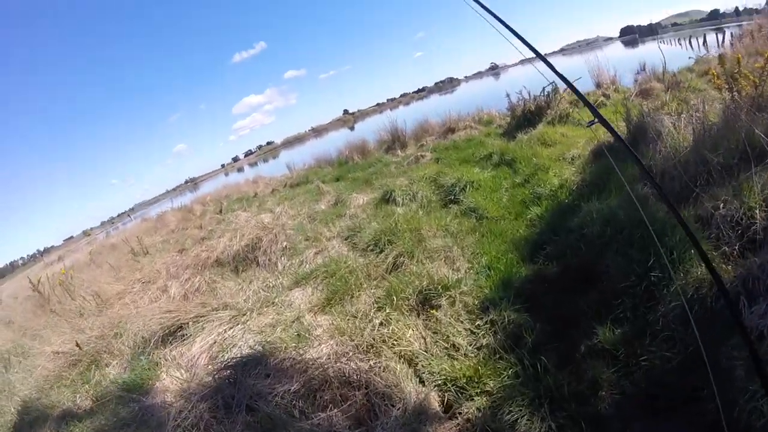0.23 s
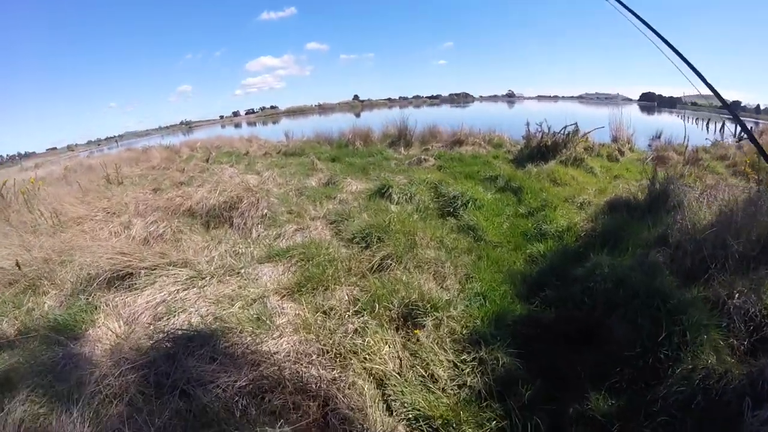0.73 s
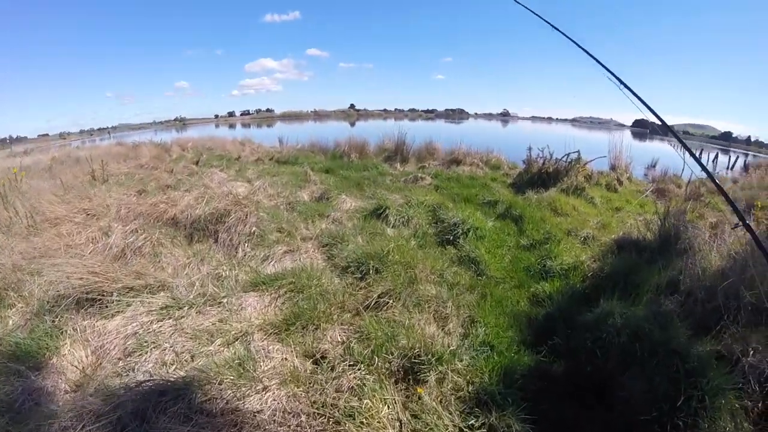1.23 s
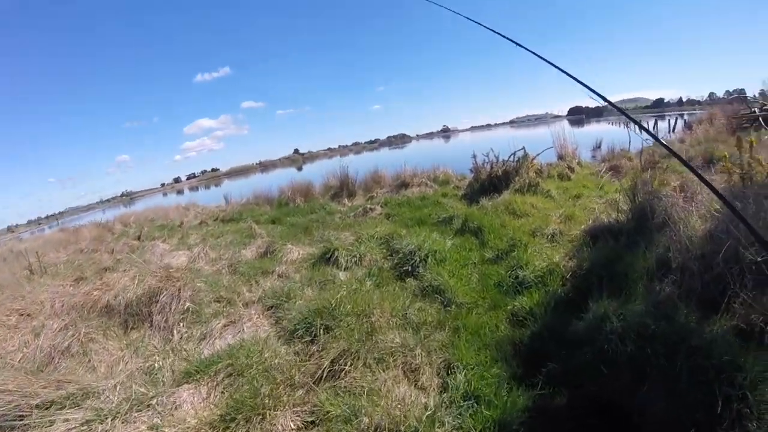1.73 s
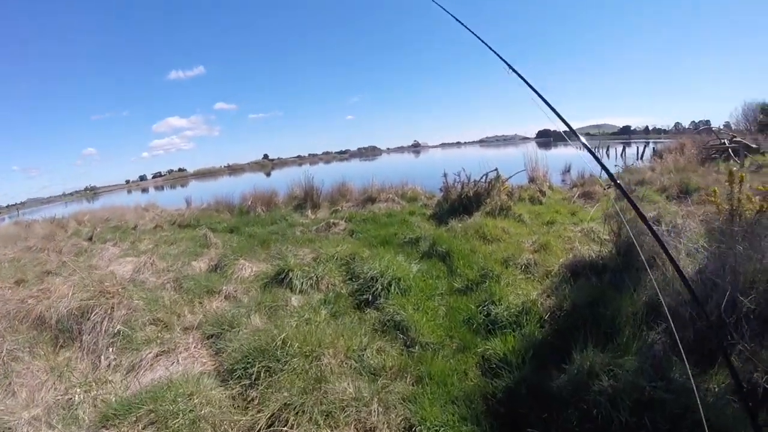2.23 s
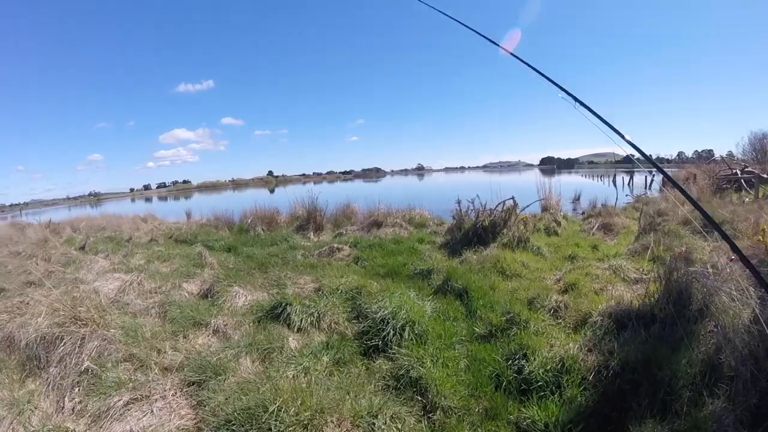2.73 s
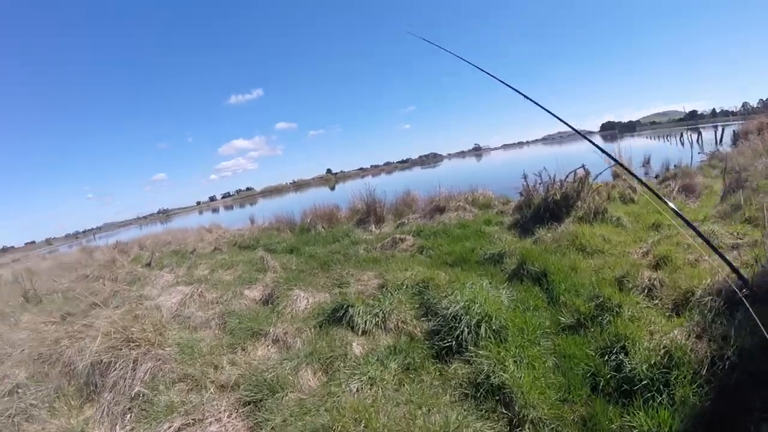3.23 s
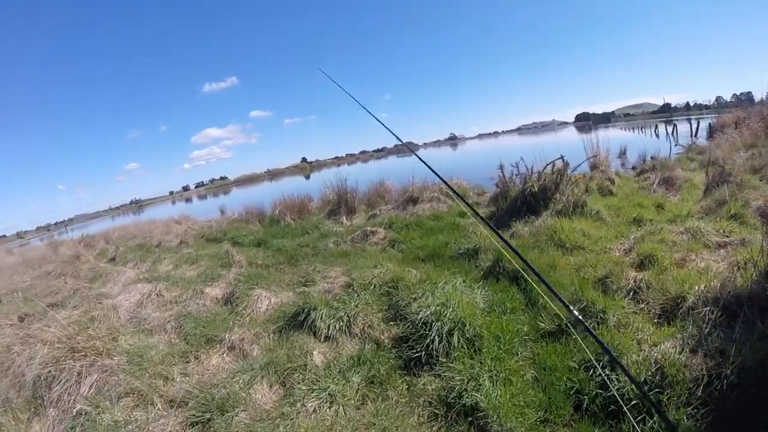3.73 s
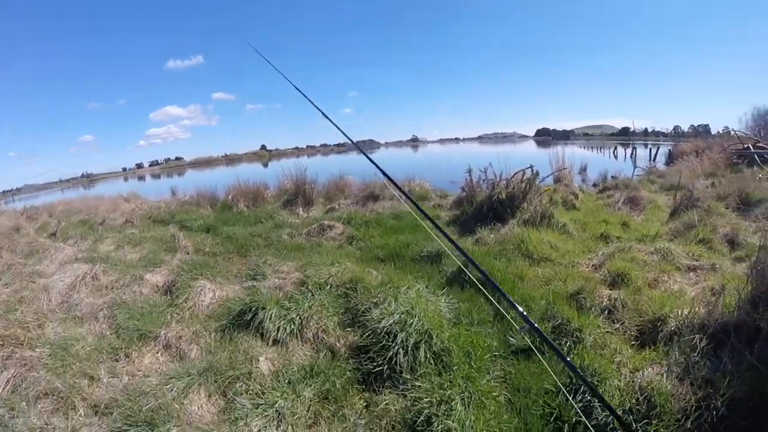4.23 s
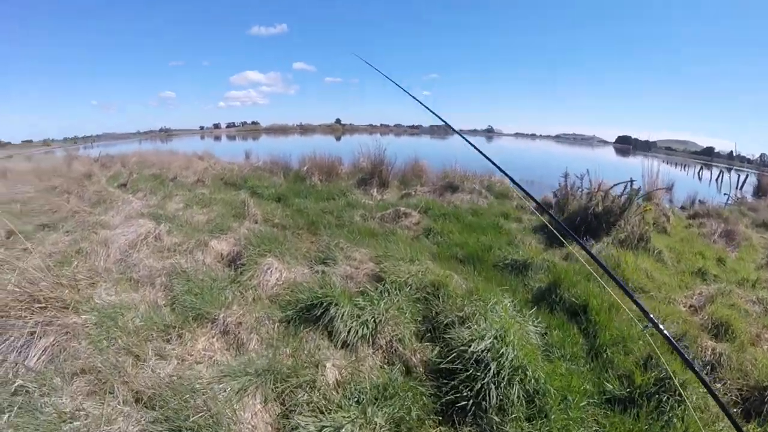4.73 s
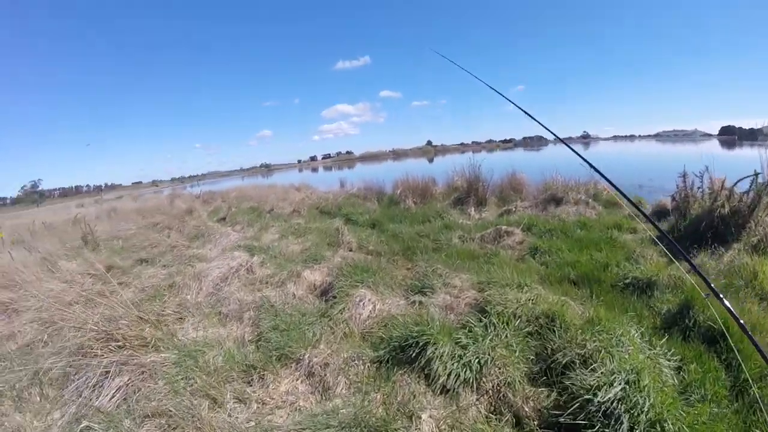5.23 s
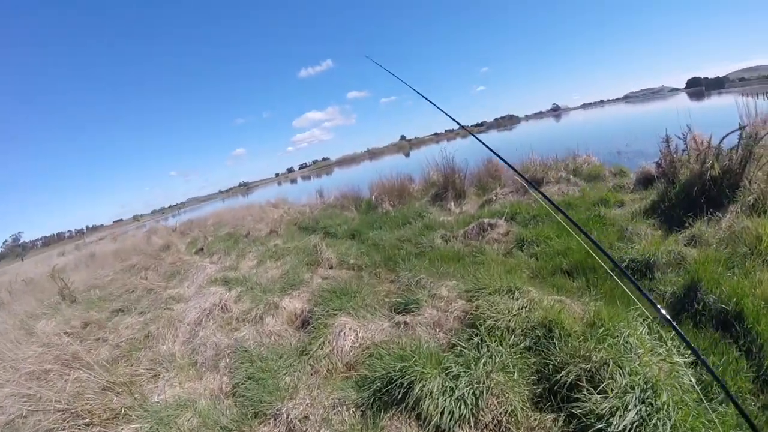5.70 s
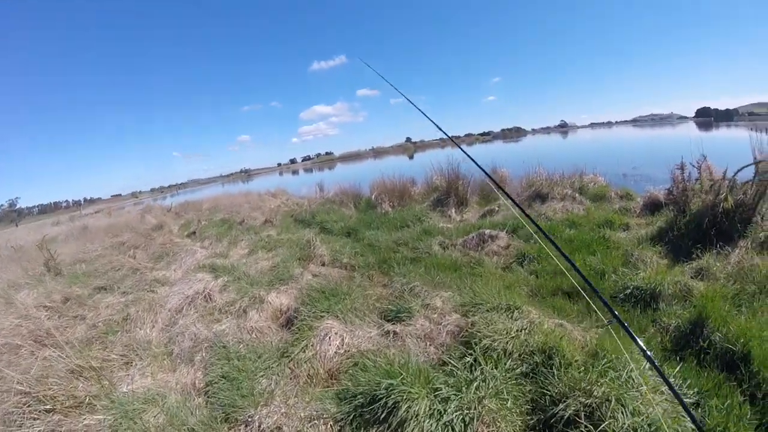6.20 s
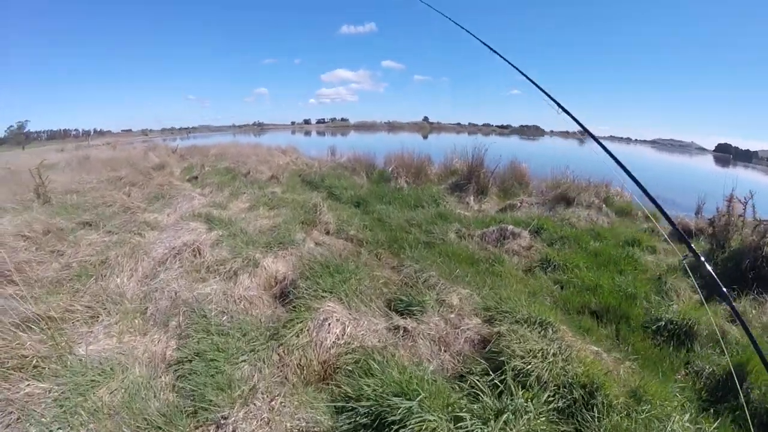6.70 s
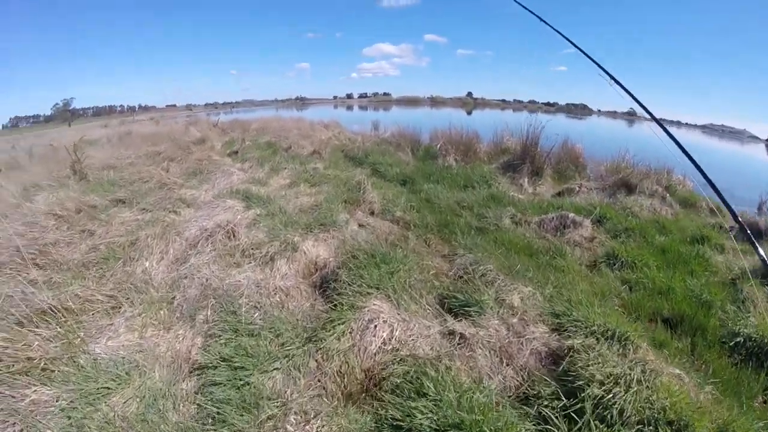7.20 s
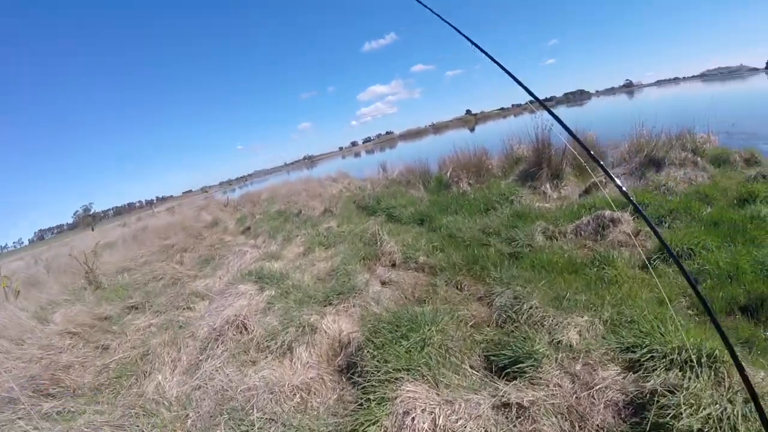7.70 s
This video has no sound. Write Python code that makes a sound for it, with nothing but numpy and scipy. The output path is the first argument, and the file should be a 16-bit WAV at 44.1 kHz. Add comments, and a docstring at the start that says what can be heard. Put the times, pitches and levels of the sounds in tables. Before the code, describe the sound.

From 0 seconds a dense frog chorus is already calling on an open lake shore. Five near frogs each repeat a rapid burst of four accelerating, ringing clicks, mostly between 2 and 4 kHz, about three to five bursts a second, interlocking over a throbbing crowd with tiny dips. Steady soft hiss and faint rubbing of clothes run throughout. Small dry knocks of a held fishing rod occur at about 0.1, 0.6 and 1.1 seconds, then a quick cluster at 2.7. Low, short wind bumps hit the microphone around 1.4 to 2.4, at 3.6 and 5.3. Grainy grass swishes pass at 2.9, 3.4 and 4.5. The chorus steadily swells; after 5 seconds sharp single clicks crowd in. A firmer knock at 6.6 and a stronger rustle at 6.8 precede the loudest frogs near 7. More wind bumps and swishes follow to 7.6, with calling continuing to 8.

```python
"""Small frogs call from a grassy lake shore, each call four quickening clicks that ring the vocal sac.
From the start five close frogs call over a crowd, with hiss, soft rubbing and a few knocks of a held fishing rod.
Wind soon buffets the microphone, as low lumps of shaped noise, and clothes and grass swish in grainy noise.
The crowd grows louder as the microphone is carried along the shore. After five seconds sharp single clicks
crowd in; near seven the two loudest frogs peak, with a last knock and a stronger rustle just before."""
import sys
import numpy as np
from scipy import signal
from scipy.fft import rfft, irfft, next_fast_len
from scipy.io import wavfile
from scipy.ndimage import uniform_filter1d

SR = 44100
rng = np.random.default_rng(int(sys.argv[2]) if len(sys.argv) > 2 else 0)


def master_out(mix):
    """Clip the mix to full scale and print it as 16-bit PCM to the path in sys.argv[1]."""
    frames = np.transpose(np.atleast_2d(mix))
    ceiling = np.clip(frames, -1, 1)
    pcm = np.round(ceiling * 32767).astype(np.int16)
    wavfile.write(sys.argv[1], SR, pcm)


N = 350595
TIME = np.arange(N) / SR  # s

# Steady hiss of the air and the microphone. Each row: frequency in Hz, relative density in dB.
HISS_COLOUR = [(60, -12), (105, -11), (140, 8.5), (290, 3), (400, -11), (1500, -33), (5000, -26),
               (6050, -11), (6450, 3), (6900, -4.5), (8800, -8.5), (10300, -17.5), (12500, -14),
               (14000, -29)]
# Spectrum of the wind rumble. Each row: frequency in Hz, relative level in dB.
WIND_COLOUR = [(10, -4.5), (25, 1.5), (50, -3.5), (75, -8.5), (105, -13), (150, -25), (250, -36),
               (600, -52)]
# Gusts on the microphone. Each row: centre in seconds, half-length in seconds, level in dB before the wind trim.
GUSTS = [(.48, .04, -34), (1.39, 0.045, -26), (1.506, 0.027, -22), (1.707, 0.16, -31), (1.902, 0.023, -29),
         (2.134, 0.068, -31.5), (2.35, 0.073, -32), (3.589, 0.023, -28), (5.295, 0.03, -20.5),
         (6.792, 0.035, -24.5), (6.964, 0.13, -29), (7.094, 0.019, -23.5), (7.373, 0.017, -22.5),
         (7.61, 0.099, -27)]
# Spectrum of rubbing clothes and grass. Each row: frequency in Hz, relative level in dB.
RUSTLE_COLOUR = [(100, -3.5), (280, 4), (430, -0.5), (750, -1.5), (1100, -4.5), (1600, -9.5), (3000, -13.5),
                 (5500, -14), (8000, -23), (11000, -42.5)]
# Soft, steady rubbing of clothes. Each row: time in seconds, level in dB before the rubbing trim.
RUBBING = [(0.0, -52.5), (0.42, -54), (1.0, -51), (1.68, -51.5), (3.34, -51.5), (3.87, -54.5), (4.72, -51),
           (6.2, -53.5), (6.75, -46), (7.11, -51), (7.48, -49.5), (7.95, -53)]
# Swishes of clothes and grass. Each row: centre in seconds, half-length in seconds, level in dB before
# the swish trim, brightness in dB per octave.
SWISHES = [(0.403, 0.074, -50.5, 2.5), (0.92, 0.25, -54.5, -8), (1.416, 0.075, -49.5, -3.5),
           (1.58, 0.12, -59, 4.5), (2.435, 0.047, -49, -.7), (2.894, 0.023, -46.5, -1),
           (3.153, 0.034, -56, -7), (3.383, 0.041, -44.5, .3), (4.25, 0.11, -58, 4.5),
           (4.5, 0.072, -45.5, 1), (4.835, 0.092, -56, -7), (6.798, 0.13, -43, -.5),
           (7.298, 0.12, -53, 4.5), (7.408, .05, -48, 1), (7.598, 0.075, -47, -2.5)]
# Knocks of handled fishing gear. Each row: start in seconds, peak of the ring in dB, centre of the ring in Hz,
# peak of the dry snap in dB, snap pitch as a factor.
KNOCKS = [(.132, -36.5, 450, -33.5, 0.65), (.569, -28.5, 420, -31.5, 0.39), (1.066, -33, 600, -25, 2.1),
          (2.709, -33, 750, -30.5, 0.6), (2.74, -32, 600, -30, .7), (2.778, -35, 503, -26.5, 0.89),
          (6.584, -25, 650, -21, 1.24)]
# Resonances of the gear. Each row: nominal frequency in Hz, relative level in dB, 60 dB decay in seconds.
KNOCK_MODES = [(288, 4.5, .05), (500, 0, .03), (754, 0.5, 0.032), (1165, -1.5, 0.022), (1670, 0.5, 0.021),
               (1970, 4, 0.022)]
# Spectrum of the contact itself. Each row: frequency in Hz before the pitch factor, relative density in dB.
SNAP_COLOUR = [(250, -4.5), (500, 5), (2000, -4), (3200, -12.5), (5000, -24), (8000, -40)]
# Usual gaps between a close frog's four clicks. Each row, one a frog: first, second and third gap in seconds.
CLICK_GAPS = [(.0363, .0221, .0136), (.024, .0187, .0122), (.038, .0222, .0126), (.0325, .029, .017),
              (.029, .0215, .0165)]
# Strength of the four clicks in a call, the last one weaker. Each entry: relative level in dB.
CLICK_DB = [0.078, 0.98, 1, -0.66]
# Ring of a typical frog's click. Each row: frequency in Hz before the pitch factor, relative level in dB.
COMMON_VOICE = [(1450, -42), (2000, -19), (2400, -7.5), (2850, -4.5), (3250, 3), (3650, -11.5),
                (4000, -15.5), (4700, -26), (5600, -38)]
COMMON_HZ = 3250  # strongest part of the typical ring
# Moments when the further frogs thin out together. Each row: centre in seconds, half-length in seconds.
LULLS = [(0.212, 0.031), (.33, .02), (.62, 0.018), (0.792, .045), (2.077, 0.018), (2.54, .05), (2.792, .03),
         (3.683, .02), (4.716, 0.052), (5.512, 0.027), (6.23, 0.044), (7.333, 0.018), (7.672, 0.012)]
LULL_DEPTH = 0.67  # share of the crowd's amplitude that drops out
APPROACH_DB_PER_S = 0.8042  # the crowd grows louder as it comes nearer
# Sharpest single clicks from other frogs. Each row: peak in seconds, peak in dB before the click trim, pitch in Hz.
LONE_CLICKS = [(0.338, -30, 3280), (.4047, -30, 3420), (0.6302, -21, 3220), (3.1789, -25, 3320),
               (3.949, -17, 3300), (3.9925, -19.9, 3230), (4.7425, -18, 3070), (5.4015, -13, 3200),
               (5.7904, -23, 3170), (6.1716, -17, 3250), (6.231, -18, 3330), (6.2876, -16, 3210),
               (6.432, -14, 3350), (6.49, -17, 3200), (6.5716, -15, 3320), (6.6582, -17.4, 3100),
               (6.7064, -18.1, 3300), (6.8627, -20, 3270), (6.974, -17, 3240), (7.1124, -17.5, 3060),
               (7.1912, -14, 3390), (7.4545, -25, 3400), (7.7576, -13, 3460), (7.9012, -14.5, 3530),
               (7.9367, -15.5, 3540)]
# Ring of each close frog's click, one list a frog. Each row: nominal frequency in Hz, relative level in dB.
CLOSE_VOICES = [
    [(1500, -51.5), (2400, -22), (2850, -7), (3200, -9.5), (3460, 4), (3720, -9.5), (4100, -28),
     (5500, -44.5)],
    [(1800, -49), (2750, -6), (3250, -13), (3620, -12.5), (3930, 1), (4230, -10.5), (4850, -17.5),
     (5400, -37)],
    [(1500, -51), (2050, -20), (2400, -2.5), (2780, -14.5), (3120, 0.5), (3450, -10), (3900, -26.5),
     (5500, -47.5)],
    [(1600, -37), (2250, -25.5), (2750, 0), (3300, -17), (3650, -10), (4000, -5), (4650, -19),
     (5500, -31.5)],
    [(1500, -39), (1930, -3), (2250, 3.5), (2650, -11.5), (3050, -2.5), (3550, -13.5), (4200, -37),
     (5500, -41)],
]
# Calls of the leading frog. Each row: first click in seconds, length as a factor on its usual gaps.
LEAD_CALLS = [(.1053, 0.92), (.3689, 0.99), (.6655, 1.02), (.9646, 0.95), (1.2488, 1.02), (1.5499, 0.98),
              (1.827, 0.98), (2.0996, 0.97), (2.3693, 1.1), (2.6188, 1.04), (2.8785, 0.9), (3.1443, 1.1),
              (3.4127, 0.92), (3.6575, 0.87), (3.9116, 1.2), (4.174, 1.05), (4.4475, 0.92), (4.7165, 1.01),
              (4.9831, 1.23), (5.2514, .93), (5.5279, 1.02), (5.8265, 0.93), (6.0757, 0.97), (6.3737, 1.08),
              (6.629, 0.96), (6.8748, 1.18), (7.1281, 1.06), (7.397, .98), (7.6512, 1.04)]
# Calls of the frog that answers it. Each row: first click in seconds, length as a factor on its usual gaps.
ANSWER_CALLS = [(0.1545, 1.16), (.3998, 1.04), (0.648, 1.05), (0.9154, 1.05), (1.1763, 1.03),
                (1.4363, 0.95), (1.6992, .95), (1.9534, 1), (2.2388, 0.89), (2.528, 0.97), (2.8004, 1.1),
                (3.0856, 1.04), (3.3639, 0.92), (3.6128, 1), (3.9147, .95), (4.1766, 1), (4.435, 0.92),
                (4.6992, 0.98), (4.9639, 1.1), (5.2339, 1), (5.516, .96), (5.7689, 0.95), (6.0117, 0.98),
                (6.256, 1.05), (6.5191, 1.1), (6.7481, 1.07), (6.9891, 1.04), (7.229, 1.04), (7.463, 0.98),
                (7.7266, .99)]
# Bouts of three neighbours, one list a frog. Each row: nominal first call, end and period, all in seconds.
BOUTS = [
    [(.017, 3.95, 0.28), (4.078, 5.17, 0.25), (5.39, 6.4, .289), (6.61, 7.85, .269)],
    [(.099, 1.63, .2809), (2.382, 3, .24), (3.21, 3.7, .324), (3.956, 4.92, .2765), (5.08, 6.15, .3085),
     (6.256, 7.87, .297)],
    [(.162, 2.0, .2879), (2.133, 4.53, 0.23), (4.625, 6.05, .216), (6.138, 7.9, .2047)],
]
# Nearness of each close frog as the microphone is carried along, one list a frog.
# Each row: time in seconds, nominal click peak in dB.
NEARNESS = [
    [(0, -23), (3.3, -23), (3.95, -21.5), (5.8, -21), (7, -16), (7.95, -18)],
    [(0, -34), (1.6, -26.5), (3.5, -25), (6.4, -20), (7.15, -15), (7.95, -19.5)],
    [(0, -26.5), (1.5, -23.5), (2.6, -22.5), (4.5, -26.5), (5.3, -24.5), (6.9, -22), (7.95, -34)],
    [(0, -39), (2.2, -29), (3.2, -25), (4.7, -22), (5.95, -26.5), (6.45, -24), (7.95, -26)],
    [(0, -35), (7.95, -29)],
]


def amp(db):
    """Turns decibels into an amplitude factor."""
    return 10 ** (np.asarray(db) / 20)


def evened(x):
    """Scales a sound to rms 1."""
    return x / np.sqrt(np.mean(x ** 2) + 1e-20)


def curve(rows):
    """Joins (s, value) rows by straight lines."""
    return np.interp(TIME, *np.transpose(rows))


def swell(s, half_s):
    """A smooth rise and fall of height 1 around time s."""
    return np.exp(-np.minimum(((TIME - s) / half_s) ** 2, 50))


def flutter(per_s):
    """A random unevenness with per_s fresh values a second, joined by lines."""
    return np.interp(TIME * per_s, np.arange(N), rng.standard_normal(N))


def colour(points, hz):
    """A spectrum in dB on a log-frequency axis, falling steeply beyond its ends."""
    f, db = np.transpose(points)
    octave, knots = np.log2(hz + 1), np.log2(f + 1)
    beyond = abs(octave - np.clip(octave, knots[0], knots[-1]))
    return np.maximum(np.interp(octave, knots, db) - 20 * beyond, -100)


def noise(points):
    """Noise of rms 1 with the given spectrum."""
    gain = amp(colour(points, np.fft.rfftfreq(N, 1 / SR)))
    return evened(irfft(rfft(rng.standard_normal(N)) * gain, N))


def add(mix, s, sound):
    """Mixes a sound in at time s, trimming what falls outside."""
    start = int(round(s * SR))
    part = mix[max(start, 0):max(start + len(sound), 0)]
    part += sound[max(-start, 0):][:len(part)]


def ring(voice, pitch, size=1024):
    """A sudden push that rings out with the voice's spectrum (minimum phase), peak 1."""
    hz = abs(np.fft.fftfreq(size, 1 / SR)) / pitch
    log_gain = np.log(amp(colour(voice, hz)))
    click = np.fft.ifft(np.exp(np.conj(signal.hilbert(log_gain)))).real[:size // 2]
    return click / abs(click).max()


def shore(x, t60, size=SR // 3):
    """Scatter from reeds and banks: sparse echoes that die away, energy 1."""
    t = np.arange(size) / SR
    sparse = rng.standard_normal(size) * (rng.random(size) < 2500 / SR)  # about 2500 echoes a second
    taps = sparse * (t > .0015) * amp(-60 * t / t60)
    return signal.oaconvolve(x, taps / np.linalg.norm(taps))[:N]


def hiss(level_db=-55):
    """Steady coloured noise of the air and the microphone."""
    return amp(level_db) * noise(HISS_COLOUR)


def wind(level_db=1.5, breeze_db=-39, breeze_cut_hz=33):
    """Gusts make a low, lumpy rumble at the microphone; the steady breeze has less deep bass."""
    gusts = np.sqrt(sum((amp(db) * swell(s, half_s)) ** 2 for s, half_s, db in GUSTS))
    b, a = signal.butter(2, breeze_cut_hz, "high", fs=SR)
    breeze = signal.lfilter(b, a, noise(WIND_COLOUR))
    return amp(level_db) * (gusts * noise(WIND_COLOUR) + amp(breeze_db) * breeze)


def rustle(rubbing_db=2, swish_db=2, grain_db=2.1, patchy_db=1.4, crackle_db=4.0, pivot_hz=1000):
    """Fibres catch and slip, so the rubbing noise is grainy; each swish crackles with its own brightness."""
    grain = amp(grain_db * flutter(180) + patchy_db * flutter(14))
    rubbing = evened(noise(RUSTLE_COLOUR) * grain)
    out = rubbing * amp(curve(RUBBING) + rubbing_db)

    size = next_fast_len(N)
    crackle = amp(crackle_db * flutter(260))
    fibres = rfft(evened(noise(RUSTLE_COLOUR) * crackle), size)
    # the tilt stops one octave below the pivot
    octaves = np.log2(np.maximum(np.fft.rfftfreq(size, 1 / SR) / pivot_hz, .5))
    for s, half_s, db, tilt_db in SWISHES:
        swish = irfft(fibres * amp(tilt_db * octaves), size)[:N]
        out += swish * amp(db + swish_db) * swell(s, half_s)
    return out


def knocks(octaves=0.82, scrape=0.55, scrape_s=.003, snap_s=0.0038, size=4000):
    """A brief scraping contact snaps and rings the gear, favouring the modes near each knock's centre."""
    out, t = np.zeros(N), np.arange(size) / SR
    for s, db, centre_hz, snap_db, snap_pitch in KNOCKS:
        body = np.zeros(size)
        for hz, mode_db, t60 in KNOCK_MODES:
            favour = np.exp(-(np.log2(hz / centre_hz) / octaves) ** 2 / 2)
            detuned_hz = hz * rng.uniform(0.915, 1.085)
            body += amp(mode_db - 60 * t / t60) * favour * np.sin(2 * np.pi * detuned_hz * t)
        contact = (t == 0) + scrape * rng.standard_normal(size) * np.exp(-t / scrape_s)
        knock = signal.fftconvolve(contact, body)[:size]
        # a higher snap is also shorter
        burst = rng.standard_normal(size) * np.exp(-t * snap_pitch / snap_s)
        snap = signal.fftconvolve(burst, ring(SNAP_COLOUR, snap_pitch))[:size]
        both = amp(db) * knock / abs(knock).max() + amp(snap_db) * snap / abs(snap).max()
        add(out, s - scrape_s, both)
    return out


def add_call(mix, s, db, gaps, click, uneven_db):
    """Mixes in four clicks at the given gaps, each a little different in strength."""
    starts = s + np.r_[0, np.cumsum(gaps)] - abs(click).argmax() / SR  # times mark the click peaks
    gains = amp(db + np.array(CLICK_DB) + uneven_db * rng.standard_normal(len(starts)))
    for start, gain in zip(starts, gains):
        add(mix, start, gain * click)


def chorus_swell(throb_db=1.5, lag_turns=0.015):
    """The crowd thins as the leader starts a call and swells in reply; now and then it drops back."""
    turns = np.interp(TIME, [s for s, _ in LEAD_CALLS], np.arange(len(LEAD_CALLS)))
    throb = throb_db * np.cos(2 * np.pi * (turns - lag_turns))
    pauses = 1 - LULL_DEPTH * sum(swell(s, half_s) for s, half_s in LULLS)
    return pauses * amp(APPROACH_DB_PER_S * TIME - throb)


def chorus(count=15, level_db=-41.0, distance_db=9, pitch_spread=0.056, wet_db=-7.5):
    """Further frogs, each repeating its call three to five times a second, swelling and thinning together."""
    out = np.zeros(N)
    for k in range(count):
        pitch, period, length = rng.uniform(-1, 1, 3)
        click = ring(COMMON_VOICE, 1 + pitch_spread * pitch)
        gaps = (1 + length / 10) * np.array(CLICK_GAPS[k % len(CLICK_GAPS)])
        waits = (.27 + .05 * period) * (1 + .06 * rng.standard_normal(45))  # s
        for s in np.cumsum(waits) - 1 - rng.random():
            add_call(out, s, -distance_db * k / count, gaps, click, uneven_db=2.0)
    out = out + amp(wet_db) * shore(out, t60=.15)
    # level the crowd over short stretches before shaping it
    power = uniform_filter1d(uniform_filter1d(out ** 2, size=2600), size=2000)
    loudness = np.sqrt(abs(power) + 1e-9)
    return out / loudness * amp(level_db) * chorus_swell()


def lone_clicks(trim_db=-1, count=12, stray_db=-27, spread_db=4.0, pitch_spread=0.044):
    """Single ringing clicks stand out of the crowd; random strays come more often as the frogs get nearer."""
    out = np.zeros(N)
    times = TIME[-1] * np.sqrt((np.arange(count) + rng.random(count)) / count)
    strays = []
    for s, (a, b) in zip(times, rng.standard_normal((count, 2))):
        db = stray_db + APPROACH_DB_PER_S * s + spread_db * a
        strays.append((s, db, COMMON_HZ * (1 + pitch_spread * b)))
    for s, db, hz in LONE_CLICKS + strays:
        click = ring(COMMON_VOICE, hz / COMMON_HZ)
        add(out, s - abs(click).argmax() / SR, amp(db + trim_db) * click)
    return out


def bout_calls(bouts, stray_s=.003, stretch=.04):
    """Calls (s, length factor) at each bout's pace, a little irregular."""
    starts = np.concatenate([np.arange(first, end, period) for first, end, period in bouts])
    late, longer = rng.standard_normal((len(starts), 2)).T
    return zip(starts + stray_s * late, 1 + stretch * longer)


def close_frogs(pitch_spread=.01, effort_db=0.52):
    """Each close frog's clicks ring its vocal sac, keeping its rhythm and ring from call to call."""
    out = np.zeros(N)
    singers = [LEAD_CALLS, ANSWER_CALLS] + [bout_calls(bouts) for bouts in BOUTS]
    for calls, gaps, voice, nearness in zip(singers, CLICK_GAPS, CLOSE_VOICES, NEARNESS):
        for s, length in calls:
            click = ring(voice, 1 + pitch_spread * rng.standard_normal())
            db = np.interp(s, *np.transpose(nearness)) + effort_db * rng.standard_normal()
            add_call(out, s, db, length * np.array(gaps), click, uneven_db=1.)
    return out


def scene(scatter_db=-13):
    """Close frogs and lone clicks with a little shore scatter, over chorus, handling, wind and hiss."""
    frogs = close_frogs() + lone_clicks()
    frogs = frogs + amp(scatter_db) * shore(frogs, t60=0.047)
    return (hiss() + wind() + rustle() + knocks() + chorus() + frogs)[None]


def record(dry, edge_hz=13900):
    """The recorder's band limit: a steep low-pass."""
    low_pass = signal.firwin(255, edge_hz, window=("kaiser", 9), fs=SR)
    return signal.oaconvolve(dry, low_pass[None], "same")


dry = scene()
out = record(dry)
master_out(out)
```